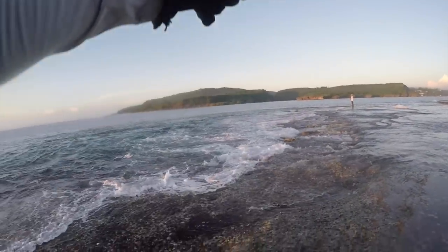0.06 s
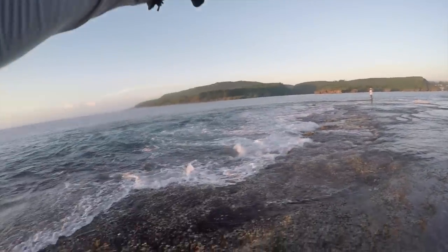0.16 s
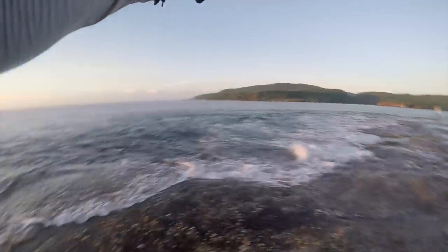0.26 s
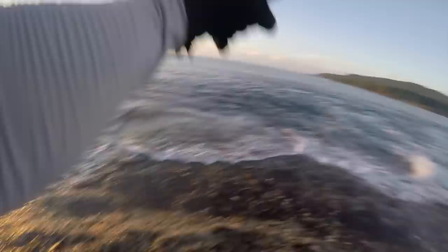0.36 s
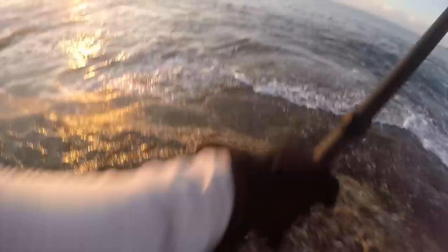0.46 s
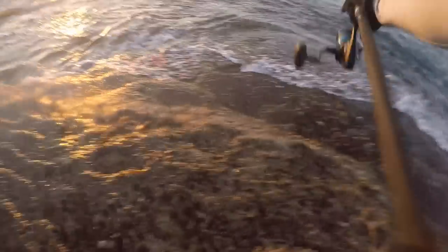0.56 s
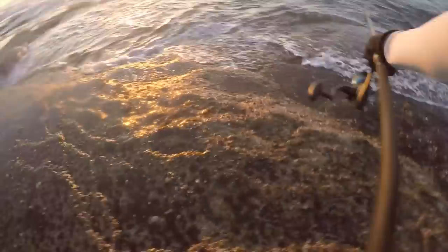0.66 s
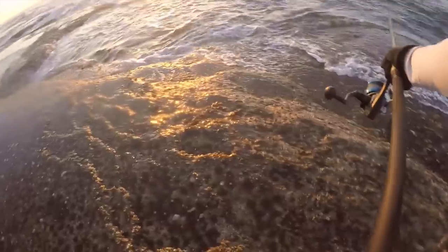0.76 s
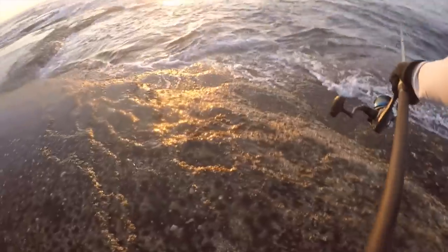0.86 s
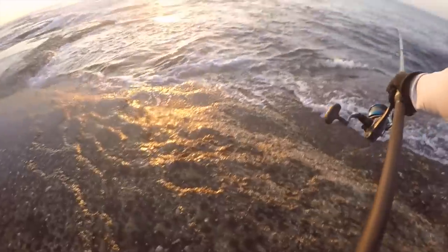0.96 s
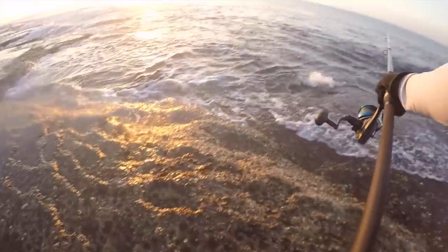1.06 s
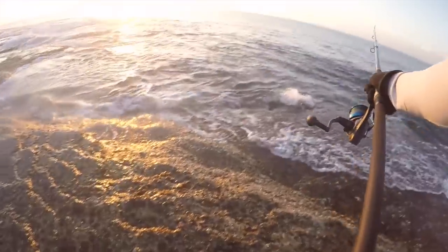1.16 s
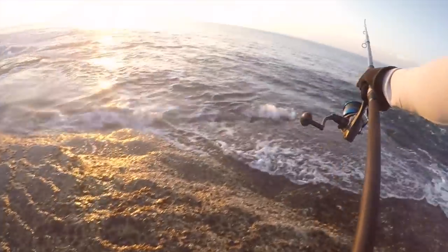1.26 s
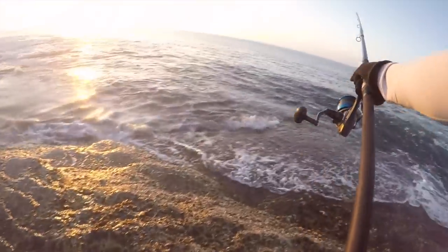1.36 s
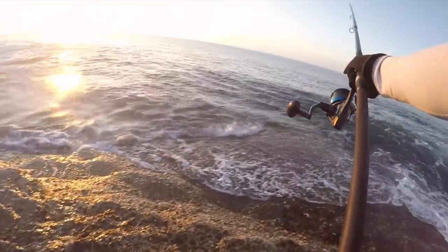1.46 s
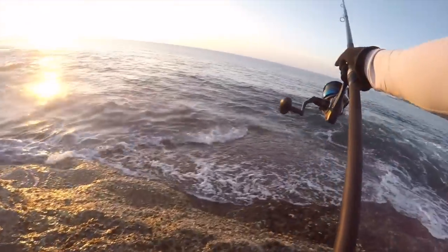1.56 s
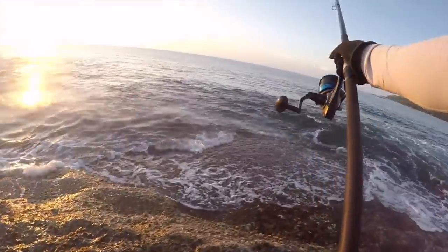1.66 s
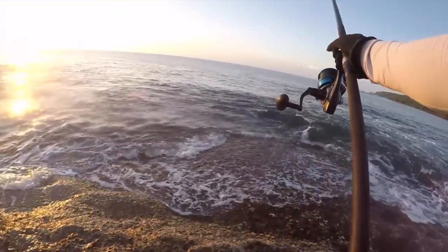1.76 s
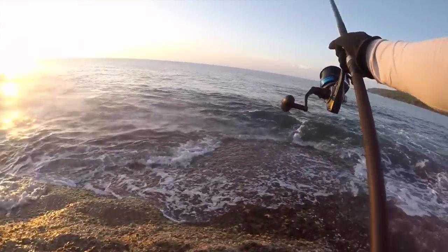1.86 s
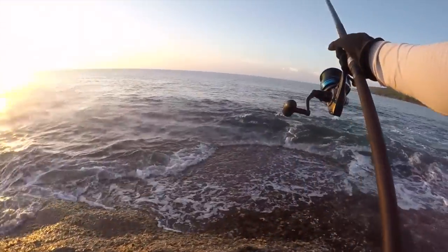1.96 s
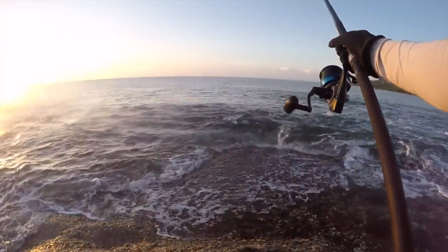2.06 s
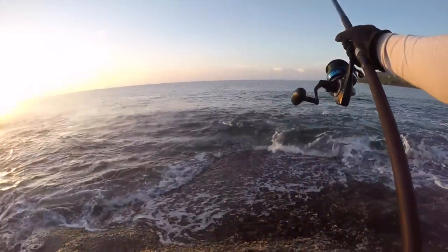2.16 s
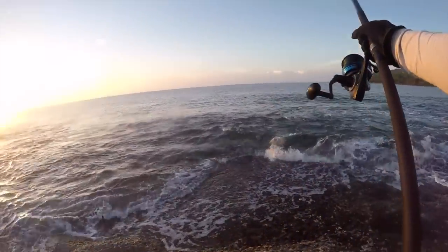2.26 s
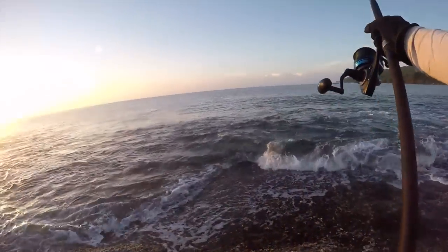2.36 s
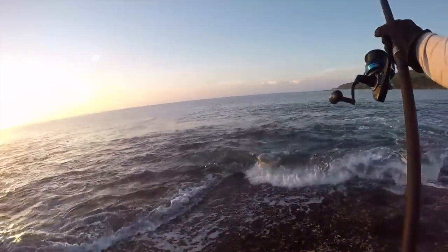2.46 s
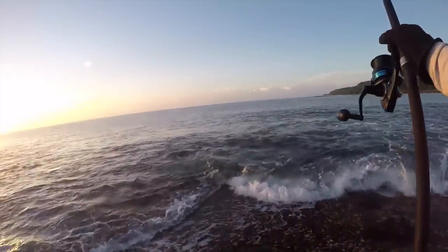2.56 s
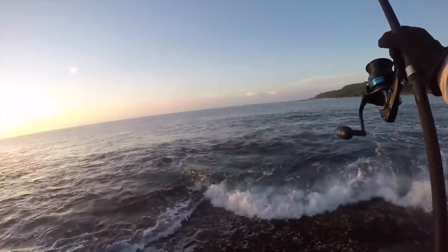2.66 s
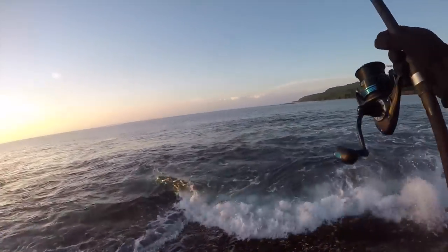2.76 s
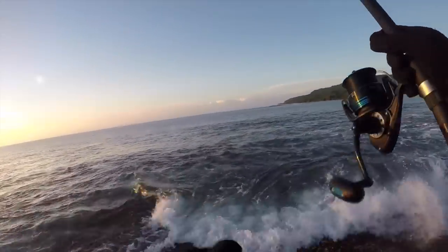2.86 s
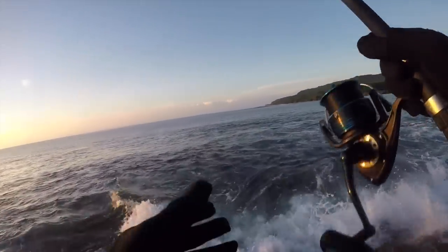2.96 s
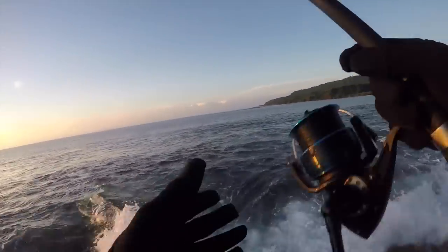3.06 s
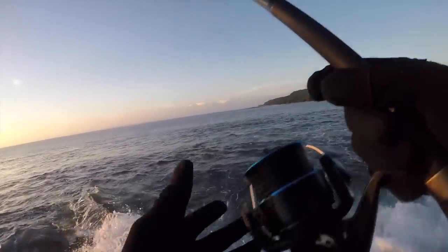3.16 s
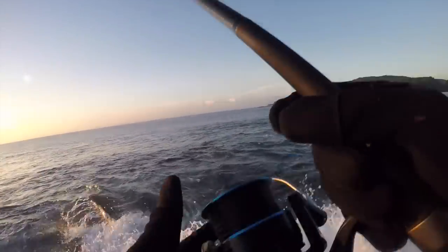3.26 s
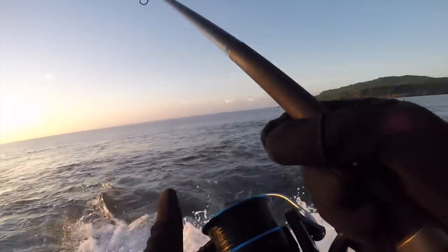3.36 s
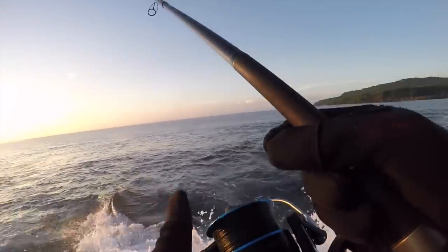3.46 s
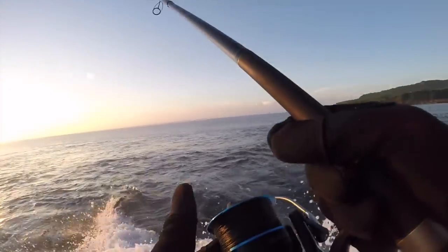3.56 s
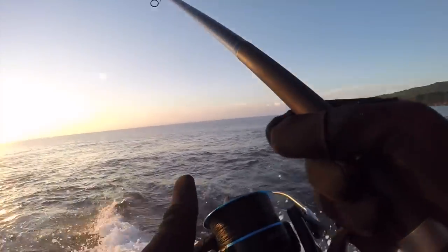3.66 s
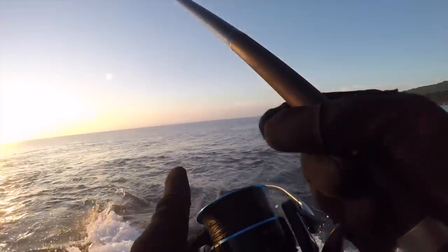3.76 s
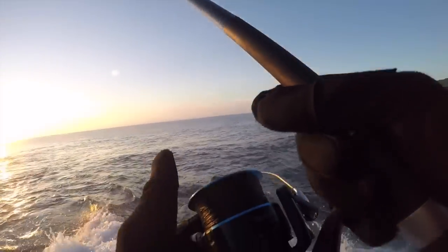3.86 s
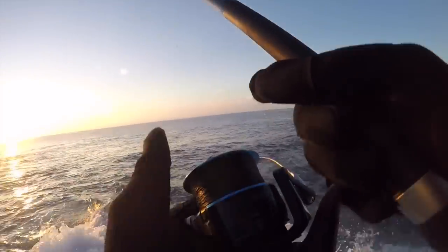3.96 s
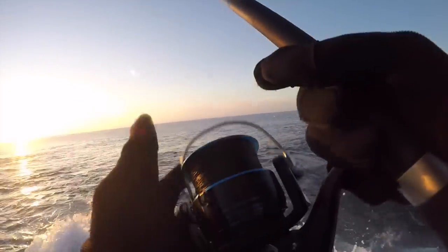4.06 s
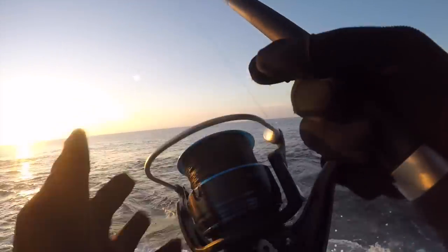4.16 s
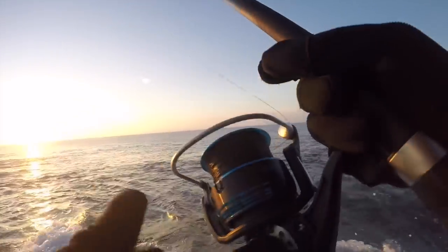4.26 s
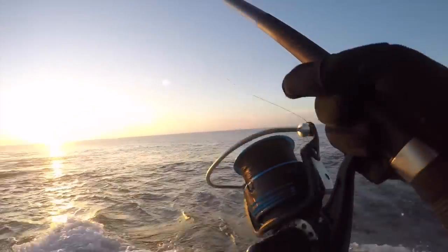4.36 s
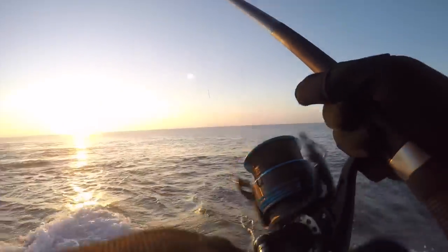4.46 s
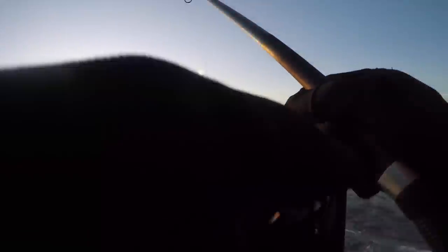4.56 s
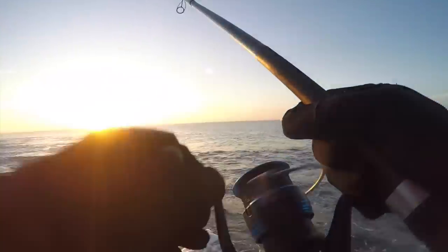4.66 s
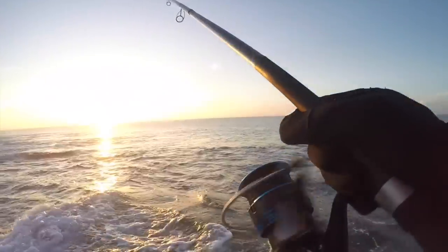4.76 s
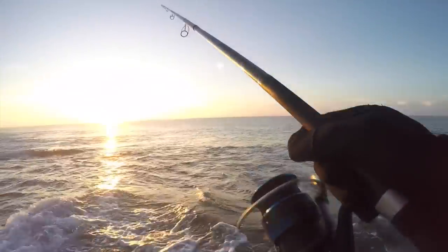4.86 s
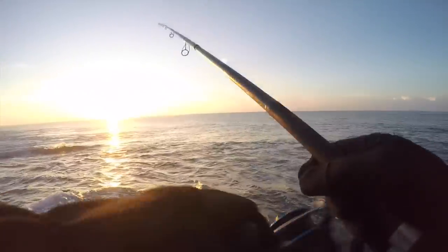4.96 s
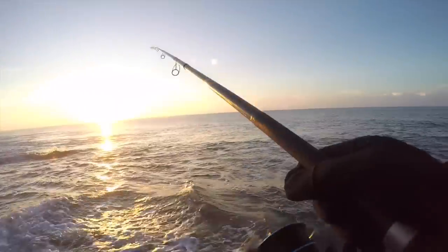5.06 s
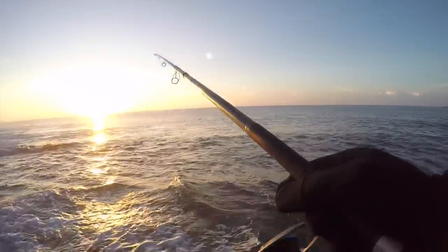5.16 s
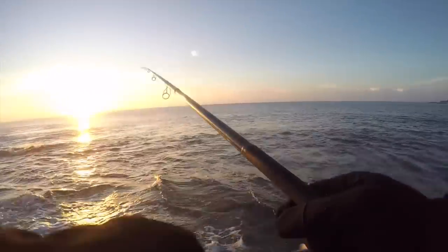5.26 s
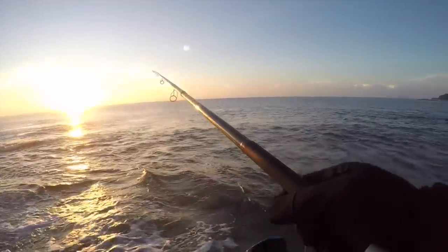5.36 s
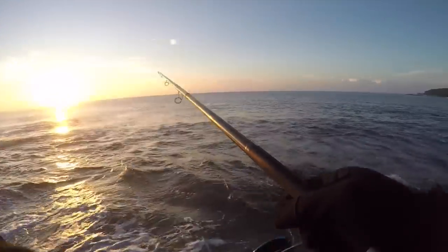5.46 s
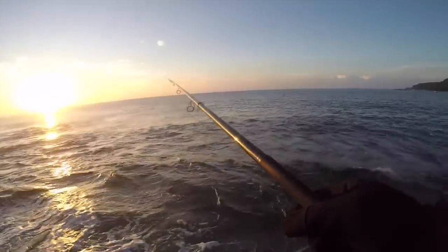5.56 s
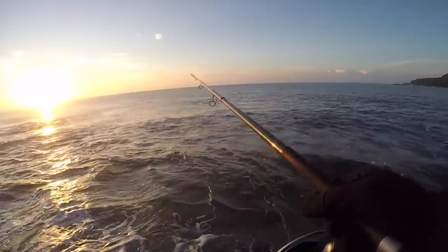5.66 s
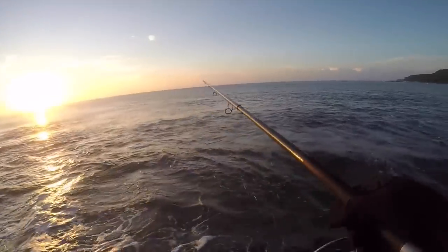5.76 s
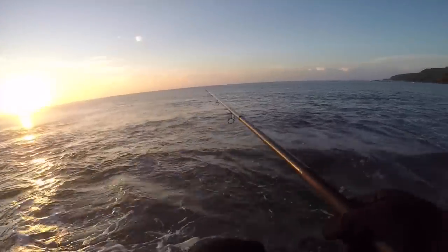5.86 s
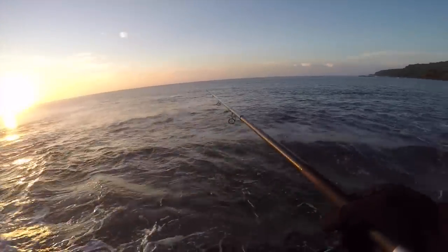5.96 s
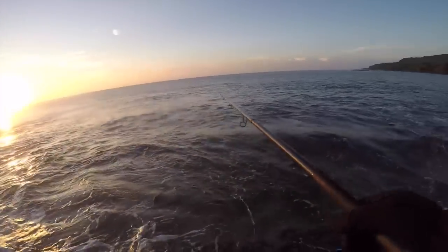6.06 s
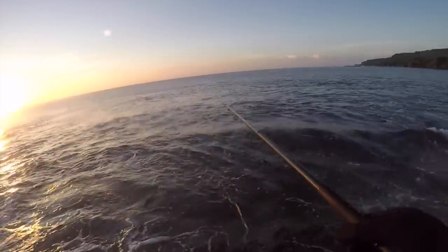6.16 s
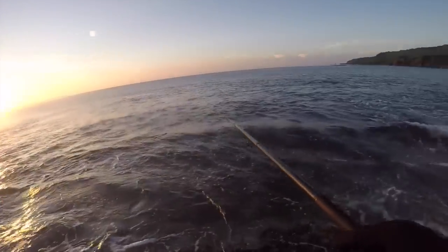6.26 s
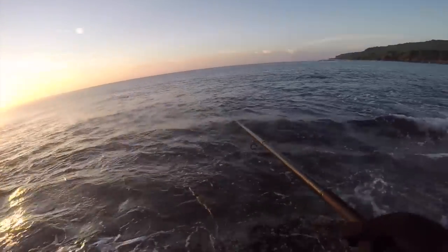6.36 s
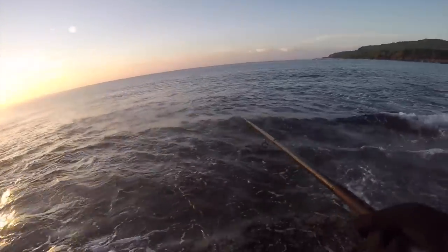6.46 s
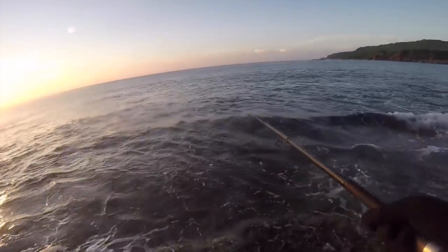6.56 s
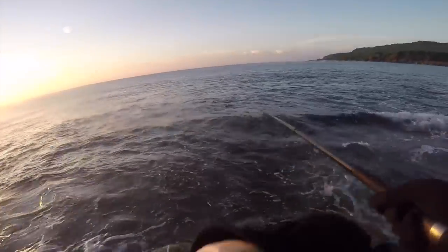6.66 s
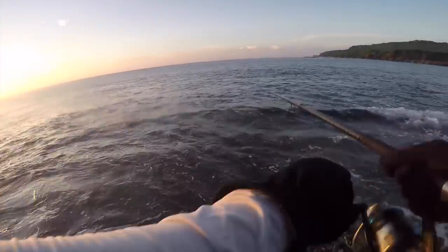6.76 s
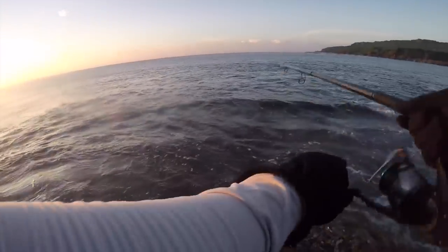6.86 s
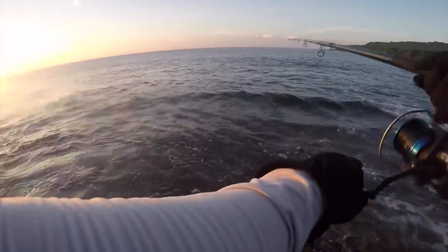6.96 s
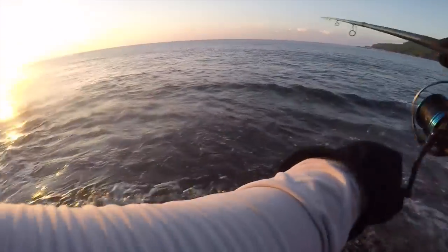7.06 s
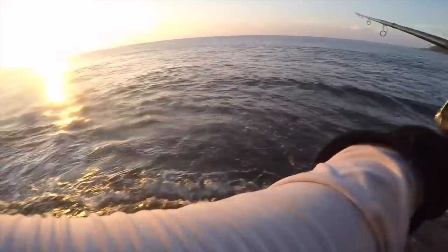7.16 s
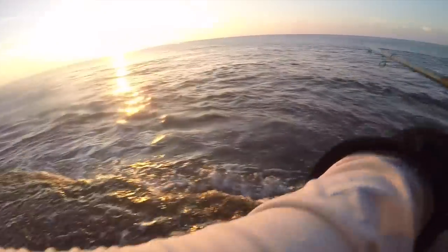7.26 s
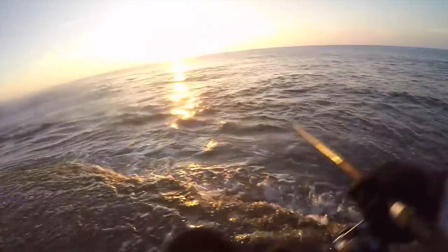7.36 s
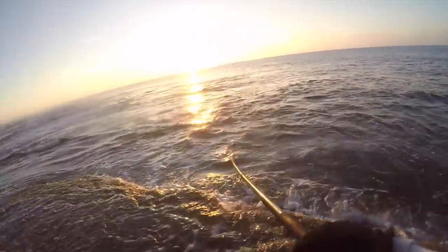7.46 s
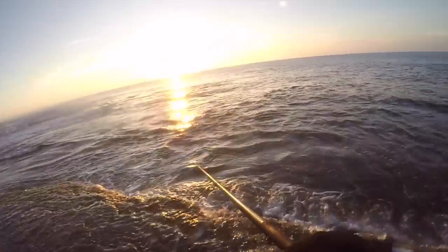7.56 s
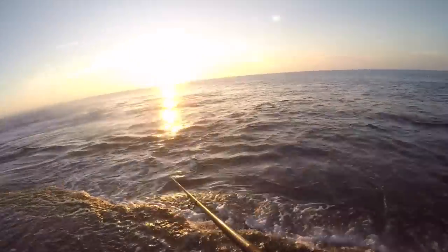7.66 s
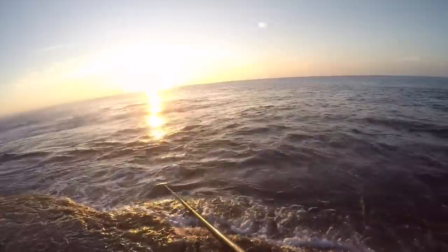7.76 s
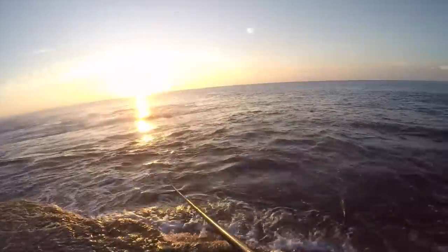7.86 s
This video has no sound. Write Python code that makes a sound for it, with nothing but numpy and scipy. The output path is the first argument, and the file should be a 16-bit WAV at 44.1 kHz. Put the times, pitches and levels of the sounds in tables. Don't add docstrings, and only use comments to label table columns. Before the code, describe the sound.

Close, boxy microphone on an angler's body by the sea. The cast begins with hard plastic-like knocks, gritty sleeve friction, rod swish and low booms, followed by a faint falling line hum. Breakers build, churn and splash over a steady slow heartbeat and low rumble. A bright metallic click and a short rasping snap come midway, then fine drips, a hollow handle tap, quieter wash, a last soft bump, and faint hiss throughout.

```python
import sys
import numpy as np
from scipy import signal
from scipy.io import wavfile
from scipy.ndimage import uniform_filter1d

SR = 44100
rng = np.random.default_rng(int(sys.argv[2]) if len(sys.argv) > 2 else 0)


def level_to_linear(level):
    exponent = np.asarray(level, float) / 20
    return 10 ** exponent


def transcribe(u):
    v = np.clip(np.atleast_2d(u).T, -1, 1)
    q = np.round(v * 32767).astype(np.int16)
    wavfile.write(sys.argv[1], SR, q)


N = 348831

# centre in Hz, width in Hz, gain in dB.
CASE = [(1442, 108, -21.5), (1750, 150, 1), (2079, 388, -11), (2516, 250, 4.5), (2920, 178, -9),
        (3430, 340, 2), (3774, 137, -7.5), (4190, 240, 4.5), (4390, 130, -4.5), (4970, 180, -5),
        (5850, 260, -7.5), (6620, 280, 4.5), (8800, 600, -3.5), (10900, 410, -3.5)]


def evened(x):
    return x / np.sqrt(np.mean(x ** 2) + 1e-20)


def column(rows, index, t):
    return np.interp(t, np.transpose(rows)[0], np.transpose(rows)[index])


def swells(rows, index, t):
    return sum(row[index] * np.exp(-((t - row[0]) / row[1]) ** 2) for row in rows)


def stroke(t, peak_s, rise_s, fall_s):
    return np.exp(-((t - peak_s) / np.where(t < peak_s, rise_s, fall_s)) ** 2)


def slope_db(points, hz):
    f, db = np.transpose(points)
    db = np.interp(np.log(hz + 1), np.log(f + 1), db)
    return db - 10 * np.log10(np.mean(10 ** (db / 10)))


def bumps_db(peaks, hz):
    return sum(db / (1 + (2 * (hz - f) / width) ** 2) for f, width, db in peaks)


def noise(field_db, size=1024, span=(0, N / SR)):
    hop, edge_hz = size // 4, 15320
    t = np.arange(span[0], span[1] + size / SR, hop / SR)
    hz = np.fft.rfftfreq(size, 1 / SR)
    a, b = rng.standard_normal((len(t), len(hz), 2)).T
    gain = level_to_linear(field_db(t, hz[:, None])) * (hz < edge_hz)[:, None]
    out = np.zeros(N)
    add(out, span[0], signal.istft((a + 1j * b) * gain, nperseg=size, noverlap=size - hop)[1])
    return out * np.sqrt(3 / size)


def patches(t, hz, frames, bins):
    field = rng.standard_normal((len(t), len(hz))).T
    return evened(uniform_filter1d(uniform_filter1d(field, int(bins), 0), int(frames), 1))


def add(mix, s, sound):
    part = mix[round(s * SR):][:len(sound)]
    part += sound[:len(part)]


def band(x, lo_hz, hi_hz):
    return signal.sosfilt(signal.butter(3, [lo_hz, hi_hz], "band", fs=SR, output="sos"), x)


def ring(drive, modes, damping=1, alternate=False):
    t = np.arange(SR // 8) / SR
    body = 0
    for k, (hz, db, t60) in enumerate(modes):
        spectrum = abs(np.sum(drive * np.exp(2j * np.pi * hz * t[:len(drive)])))
        taken = spectrum + 0.15 * np.linalg.norm(drive)
        sign = (-1) ** (k * alternate)
        body = body + sign * level_to_linear(db - 60 * damping * t / t60) * np.sin(2 * np.pi * hz * t) / taken
    out = signal.fftconvolve(drive, body)
    return out / abs(out).max()


def contact(seconds, draw):
    t = np.arange(len(draw)) / SR
    return draw * abs(draw) * np.exp(-(t / max(seconds, .0005)) ** 2) * np.minimum(t / 0.00085, 1)


def sea():
    # frequency in Hz, level in dB.
    wash = [(600, -16), (1100, -8.5), (1600, 2), (3000, -1), (3900, -11), (6500, -34)]
    plunge = [(60, -20), (130, 1.5), (400, 1), (1200, -0.5), (1900, 5.5), (3500, -53)]
    crest = [(2500, -6), (3700, 3), (4600, 1.5), (5500, -8.5), (7000, -41.5)]
    fizz = [(4000, -11.5), (5800, 3), (7000, -1), (9000, -6), (12000, -9.5), (15500, -16.5)]
    # time in seconds, wash level in dB, breaking of the crest in dB.
    waves = [(0.0, -46, -3.5), (0.8, -49.5, 1), (1.27, -48, 0.5), (1.89, -47.5, -4), (2.2, -46.5, -0.5),
             (2.44, -43, -2.5), (2.6, -40.5, 3), (3.04, -37, 3.5), (3.3, -38, -3.5), (3.45, -43.5, 0),
             (3.65, -41.5, -1.5), (3.85, -36, 0.5), (4.01, -39, 1.5), (4.12, -45, 1), (4.5, -45.5, 0),
             (5.4, -49, -1.5), (6.25, -54.5, 1.5), (7.55, -43, -5.5)]
    # calm level in dB, dB per dB of wash, dB per dB of breaking.
    follow = [
        (-55.5, .5, 0.3),
        (-58, 1.16, 0.96),
        (-63.5, 1.11, 0.73),
    ]
    # time in seconds, length in seconds, gain in dB.
    breakers = [(2.6, 0.1, 4.5), (3.14, 0.27, 7.5), (3.55, 0.29, 6.5), (3.84, 0.19, 8), (4.3, 0.24, 7),
                (7.0, 0.52, 3)]
    # time in seconds, length in seconds, gain over the fizz in dB.
    spray = [(3.5, 0.16, 5), (3.633, 0.043, 6), (4.396, 0.074, 5.5), (5.09, 0.055, 3.5), (5.17, 0.025, 7.5)]
    # time in seconds, gain over the wash in dB.
    slaps = [(2.36, -0.5), (2.39, 3), (2.53, 0), (2.685, 1), (2.79, 0), (2.82, 0), (2.98, 2), (3.05, 2),
             (3.14, 2), (3.22, 0.5), (3.395, 1), (3.55, -3), (3.69, 0), (3.74, 2), (3.785, 3), (3.9, 0),
             (3.98, 0), (4.105, -1.5), (4.34, -1), (4.37, 1.5), (4.49, 1.5)]
    # time in seconds, length in seconds, gain in dB.
    whistle = [(5.3, 0.25, 7.3)]
    calm_db, slap_rise_s, slap_fall_s = -48, 0.0041, 0.024
    whistle_hz, whistle_width_hz = 2570, 110

    def field(t, hz):
        wash_db, breaking_db = column(waves, 1, t), column(waves, 2, t)
        plunge_db, crest_db, fizz_db = (
            db + a * (wash_db - calm_db) + b * breaking_db for db, a, b in follow)
        levels_db = wash_db, plunge_db + swells(breakers, 2, t), crest_db, fizz_db
        power = sum((level_to_linear(slope_db(points, hz)) * level_to_linear(db)) ** 2
                    for points, db in zip((wash, plunge, crest, fizz), levels_db))
        foam_db = swells(spray, 2, t) + 1.14 * patches(t, hz, 86, 25)
        high_db = np.clip(hz / 7000, 0, 1) ** 2 * foam_db
        slaps_db = sum(db * stroke(t, s, slap_rise_s, slap_fall_s) for s, db in slaps)
        splashes_db = slaps_db - 0.8 + 0.82 * patches(t, hz, 2, 120)
        whistle_db = bumps_db([(whistle_hz, whistle_width_hz, swells(whistle, 2, t))], hz)
        case_db = bumps_db(CASE, hz) + 1.18 * patches(t, hz, 18, 9)
        return 10 * np.log10(power) + case_db + splashes_db + high_db + 2.0 + whistle_db
    return noise(field, size=512)


def butt():
    # time in seconds, peak in dB.
    strikes = [
        (0.4005, -4),
        (0.6728, -4),
    ]
    # delay in seconds, level in dB.
    bounce_tables = [
        [(0, -3.5), (.0011, 1.5), (.0023, 1.5), (.0043, -8.5)],
        [(0, -2.5), (.0009, -1), (.0023, 0.5), (.0041, -11)],
    ]
    # frequency in Hz, level in dB, t60 in seconds.
    mode_tables = [
        [(467, -12, 0.028), (630, 1.5, 0.048), (905, -2, 0.029), (1013, -5, 0.031), (1156, -6, .028),
         (1300, -13, 0.038), (1840, -16, .014), (2250, -7, 0.02), (2660, -23, 0.011), (3080, -17, .01),
         (3655, -9.5, .013), (4200, -13, 0.01), (4650, -22, 0.0089), (5400, -24, .007)],
        [(463, -1, .02), (598, 0, 0.047), (867, 1.5, 0.038), (1040, -3.5, 0.033), (1196, -1.5, 0.024),
         (1500, -38, .015), (1820, -12, 0.018), (2180, -9, .018), (2355, -7.5, 0.024), (3080, -19, .01),
         (3620, -12, .011), (4150, -14, .009), (4800, -29, .007), (5800, -36, .006)],
    ]
    touch_s = .00018
    out, t = np.zeros(N), np.arange(400) / SR
    for (s, db), bounces, modes in zip(strikes, bounce_tables, mode_tables):
        drive = sum(level_to_linear(b_db) * np.exp(-((t - delay - 2 * touch_s) / touch_s) ** 2)
                    for delay, b_db in bounces)
        add(out, s, level_to_linear(db) * ring(np.gradient(drive), modes, alternate=True))
    return band(out, 380, 7000)


def knocks():
    # time in seconds, peak in dB, bright peak in dB, contact in seconds, damping factor.
    blows = [(0.436, -23, -36, 0.0041, 1.1), (0.561, -31, -30, 0.0028, 0.9), (.6515, -22, -27, 0.0076, 1.5),
             (6.062, -36, -53, 0.0063, 4.4), (7.386, -22.5, -46, 0.0038, 2.3),
             (5.964, -40, -60, 0.0047, 3.1)]
    # frequency in Hz, level in dB, t60 in seconds.
    shell_modes = [(464, -39, 0.027), (633, -3, 0.068), (917, -0.5, 0.035), (1000, -5, 0.055),
                   (1125, -2, 0.025), (1270, -31, 0.033)]
    bright_modes = [(1820, -10, .015), (2290, 23, 0.014), (2600, -10, 0.01), (3100, 13, 0.015),
                    (3644, 23.5, 0.019), (4200, 21, 0.01), (4900, 1, .008), (5400, -10, .008),
                    (6650, -10, .006)]
    tap_modes = [(460, -7.5, .03), (607, -4.5, 0.05), (850, -12, 0.014), (1005, 3, 0.024),
                 (1200, -7, 0.013), (1580, -3.5, .025), (2050, -12, 0.024), (2450, -11, .015),
                 (2800, -16, 0.014), (3200, -5, 0.01), (3600, -7, 0.012), (4460, -24, 0.0095),
                 (5500, -17, 0.0073), (6400, -21, .008)]
    # time in seconds, peak in dB, contact in seconds.
    handle_tap = (5.7198, -9.5, 0.0031)
    dull_hz = 1570
    shell, bright, tap = np.zeros((3, N))
    draws = rng.standard_normal((len(blows) + 1, 800))
    tap_s, tap_db, tap_contact_s = handle_tap
    add(tap, tap_s, level_to_linear(tap_db) * ring(contact(tap_contact_s, draws[0]), tap_modes, 1.13))
    for (s, db, bright_db, seconds, damping), draw in zip(blows, draws[1:]):
        body = ring(contact(0.88 * seconds, draw), shell_modes, damping)
        add(shell, s, level_to_linear(db) * band(body, 300, dull_hz / damping ** .45))
        add(bright, s, level_to_linear(bright_db) * ring(contact(seconds, draw), bright_modes, damping))
    return band(tap, 300, 4900) + band(shell, 415, 1700) + band(bright, 2000, 6400)


def pushes():
    # time in seconds, peak in dB, frequency in Hz, t60 in seconds.
    plate = [(0.401, -15, 126.4, 0.11), (0.404, -17, 256, 0.059), (0.436, -13, 135, 0.063),
             (0.539, -7, 152, 0.024), (0.6495, -2.5, 207, 0.024), (0.675, -11.5, 135, 0.03),
             (0.706, -18, 111, 0.04), (4.582, -29.5, 269, 0.07), (4.59, -26, 115, 0.091),
             (5.603, -38.5, 140, 0.055), (5.7204, -19.5, 169, 0.048), (5.814, -42, 128, 0.056),
             (5.963, -35.5, 147, 0.051), (6.066, -28.5, 169, 0.036), (7.155, -34.5, 129, 0.052),
             (7.382, -25.5, 170, 0.0092), (7.514, -36.5, 189, 0.038), (0.246, -37.5, 131, 0.17),
             (2.35, -38.5, 158.7, 0.067)]
    out = np.zeros(N)
    for s, db, hz, t60 in plate:
        add(out, s, -level_to_linear(db) * ring(np.hanning(int(.35 * SR / hz)), [(hz, 0, t60)]))
    return out


def thud_rows():
    # trough in seconds, peak in dB, frequency in Hz.
    beats = [(0.92, -20, 43.7), (1.346, -22, 50.5), (1.771, -18.5, 47.7), (2.189, -19, 45.3),
             (2.606, -19.5, 38.4), (3.018, -19.5, 51), (3.436, -22, 49), (3.848, -23.5, 40.8),
             (4.267, -25, 51.3), (4.679, -22, 51), (5.094, -23, 52.4), (5.508, -25.5, 44),
             (5.931, -32.5, 44.45), (6.326, -26, 40.7), (6.729, -28.5, 40.8), (7.172, -30, 41)]
    # trough in seconds, peak in dB, frequency in
    # Hz, length in seconds.
    strap_jolts = [(0.082, -27.5, 35.4, 0.039), (0.309, -30, 28, 0.037), (0.383, -0.5, 35.8, 0.02),
                   (0.448, -9.5, 35, 0.023), (0.53, -11.5, 48.6, 0.033), (0.5624, -1.5, 34.6, 0.026),
                   (0.67, -5.5, 30, 0.033), (0.703, -20, 45, 0.018), (0.739, -10.5, 27, 0.046),
                   (0.767, -30, 30, 0.049), (0.837, -34, 28, 0.036), (2.441, -34, 34, 0.028),
                   (2.886, -30, 28, 0.05), (4.572, -19.5, 28.1, 0.023), (4.623, -18, 22.9, 0.045),
                   (5.182, -32.5, 28.2, 0.095), (5.613, -32, 51, 0.032), (5.826, -31, 48, 0.022),
                   (5.975, -24.5, 36.2, 0.04), (6.076, -39, 60.4, 0.0163), (7.395, -21, 40.2, 0.03),
                   (7.442, -8.5, 33, 0.043), (7.477, -21, 31.7, 0.049), (7.538, -24, 31, 0.061),
                   (7.601, -25.5, 28, 0.026), (7.723, -32, 30.7, 0.04), (4.567, -25, 70, 0.022),
                   (4.703, -28, 60, 0.016), (4.295, -32, 70, 0.016)]
    # length in seconds, quickening in 1/s.
    upright = (0.027, 10.6)
    bent = (0.034, -13)
    lean_s = 4.1
    second_s, second_db, second_hz, second_length_s, second_quicken = .19, -14, 31, 0.051, 2.4
    first = [(s, db, hz, *(upright if s < lean_s else bent)) for s, db, hz in beats]
    second = [(s + second_s, db + second_db, second_hz, second_length_s, second_quicken)
              for s, db, hz in beats]
    jolts = [(*row, -max(25.7 + 1.66 * row[1], 3.1)) for row in strap_jolts]
    return first + second + jolts


def thuds():
    out = np.zeros(N)
    for s, db, hz, length, quicken in thud_rows():
        t = np.arange(-.06 * SR, .12 * SR) / SR
        turn = 2 * np.pi * hz * np.expm1(1.5 * quicken * t) / (1.5 * quicken)
        swing = -np.cos(turn) - 0.16 * np.sin(2 * turn)
        late = t - 0.0001 * quicken
        sudden = 2 + max(-.2 * quicken, 0)
        before = abs(late / (.5 * length + 0.00041)) ** sudden
        after = (late / (0.85 * length)) ** 2
        add(out, s + t[0], level_to_linear(db - 2.5) * swing * np.exp(-np.where(late < 0, before, after)))
    return out


def rub():
    # peak time in seconds, rise in seconds, fall in seconds, level in dB, tilt in dB per octave.
    strokes = [(.37, 0.019, 0.053, -42.5, -5.5), (.45, 0.047, 0.018, -37.5, -1.5),
               (.485, 0.033, 0.017, -34.5, 1.5), (0.516, 0.036, 0.018, -29.5, 0),
               (0.546, 0.0079, 0.013, -37, -3), (0.598, 0.036, 0.025, -42, 2), (.66, 0.018, 0.0145, -35, 2),
               (0.719, 0.049, 0.014, -40.5, -1), (.765, 0.021, .015, -47, 2.5)]
    # frequency in Hz, level in dB.
    colour = [(150, -32), (300, 3), (1000, -2.5), (2500, -6.5), (4500, -10), (7000, -23.5), (8500, -34),
              (12000, -52), (15500, -56)]
    # centre in Hz, width in Hz, gain in dB.
    peaks = [(604, 86, -1), (1120, 220, 6), (2325, 250, 14.5), (3620, 400, 13.5), (6560, 500, 7),
             (12300, 1500, 5)]

    def field(t, hz):
        power = 1e-12
        for s, rise, fall, db, tilt_db in strokes:
            tilted_db = db + tilt_db * np.log2((hz + 50) / 2000)
            power = power + (stroke(t, s, rise, fall) * level_to_linear(tilted_db)) ** 2
        flutter_db = 2.6 * patches(t, hz, 3.6, 22) - 5.5
        return 10 * np.log10(power) + slope_db(colour, hz) + bumps_db(peaks, hz) + flutter_db
    return noise(field, size=256, span=(.3, .9))


def swish():
    # peak time in seconds, rise in seconds, fall in seconds, level in dB.
    passes = [(0.597, 0.017, 0.02, -35), (0.642, 0.014, 0.01, -36)]
    # frequency in Hz, level in dB.
    colour = [(500, -8), (1700, 5), (3200, 2), (4500, -6), (6800, -14), (9000, -24), (15500, -30)]

    def field(t, hz):
        power = sum((level_to_linear(db) * stroke(t, s, rise, fall)) ** 2 for s, rise, fall, db in passes)
        case_db = 0.9 * bumps_db(CASE, hz) + 3.0 * patches(t, hz, 2.6, 18)
        return 10 * np.log10(power + 1e-12) + slope_db(colour, hz) + case_db
    return noise(field, size=256, span=(.5, .7))


def hum():
    # time in seconds, frequency in Hz, level in dB.
    line = [(1.07, 144, -59), (1.1, 144, -46.5), (1.15, 120, -43), (1.2, 119, -60), (1.256, 137, -58),
            (1.26, 133, -55)]
    t = np.arange(N) / SR
    live = np.clip(np.minimum(t - line[0][0], line[-1][0] - t) / .015, 0, 1)
    phase = 2 * np.pi * np.cumsum(column(line, 1, t)) / SR
    return np.sqrt(2) * live * level_to_linear(column(line, 2, t)) * np.sin(phase)


def reel():
    # time in seconds, peak in dB, rattle in seconds.
    clicks = [(4.177, -14.5, 0.007), (4.205, -27, 0.014), (4.185, -26, 0.011), (4.698, -34.5, 0.0082)]
    # frequency in Hz, level in dB, t60 in seconds.
    wire_modes = [(1750, -9, .012), (2590, 4.5, 0.016), (3150, 2, 0.016), (3730, 4.5, 0.009),
                  (4216, -1, .01), (4660, -5, 0.013), (6400, -4, 0.011), (7730, -5, 0.022),
                  (10120, -12.5, .008), (12500, -21, .006)]
    # time in seconds, scrape level in dB, ring level in dB.
    snap = [(4.548, -53, -70), (4.566, -34.5, -54), (4.578, -35.5, -48), (4.59, -31.5, -27),
            (4.602, -32.5, -28), (4.609, -37, -53), (4.612, -70, -46), (4.66, -75, -72)]
    # frequency in Hz, level in dB.
    colour = [(200, -13), (1500, 3), (3500, -0.5), (6000, -9), (10000, -8), (15800, -15)]
    # centre in Hz, width in Hz, level in dB.
    scrape_peaks = [(3920, 460, 6), (5800, 600, 9), (5000, 360, -2)]
    buzz_peaks = [(292, 140, -7), (2010, 110, -6), (2260, 110, 0), (2633, 65, 0)]

    def scrape_field(t, hz):
        return slope_db(colour, hz) + 0.21 * bumps_db(CASE, hz) + bumps_db(scrape_peaks, hz) + 0 * t

    def buzz_field(t, hz):
        gain = sum(level_to_linear(db) / (1 + (2 * (hz - f) / width) ** 2) for f, width, db in buzz_peaks)
        return 20 * np.log10(gain) + 0 * t

    out, t = np.zeros(N), np.arange(N) / SR
    for (s, db, seconds), draw in zip(clicks, rng.standard_normal((len(clicks), 800))):
        drive = contact(seconds, draw)
        add(out, s, level_to_linear(db - 0.5) * ring(drive, wire_modes))
        add(out, s, level_to_linear(db - 4) * band(drive / abs(drive).max(), 2000, 7000))
    out = band(out, 1900, 15300)
    live, span = (t > snap[0][0]) & (t < snap[-1][0]), (4.5, 4.75)
    grit = level_to_linear(3.7 * evened(uniform_filter1d(rng.standard_normal(N), 40)))[live]
    scrape = evened(grit * noise(scrape_field, span=span)[live])
    buzz = evened(noise(buzz_field, span=span)[live])
    out[live] += level_to_linear(column(snap, 1, t[live])) * scrape + level_to_linear(column(snap, 2, t[live])) * buzz
    return out


def ticks():
    # time in seconds, peak in dB, frequency in Hz, t60 in seconds.
    taps = [(1.2, -41, 5700, 0.0051), (4.905, -42, 9200, .008), (5.11, -43, 9530, 0.0048),
            (5.183, -38, 5600, 0.0048), (5.2, -45, 10000, 0.0046), (5.257, -35, 4200, 0.0049),
            (5.2572, -46, 12000, .003), (5.358, -45, 7950, .005), (5.805, -53, 9800, .006),
            (7.047, -28, 1730, 0.02), (1.705, -48, 11000, .005), (6.98, -52, 7800, .008),
            (4.184, -28, 8000, 0.023), (4.192, -34, 6500, 0.013), (4.607, -30, 2640, 0.022),
            (4.621, -34, 2640, 0.018), (4.646, -39, 2600, 0.027), (.51, -25, 1080, 0.016),
            (.541, -38, 5600, .01), (.562, -30, 4300, .008), (.657, -34, 3750, .015),
            (.666, -28, 3650, .015), (.70, -31, 1700, 0.017), (.688, -39, 3800, .012),
            (.716, -30, 3800, 0.012), (5.731, -35, 1050, 0.013), (.4018, -23.5, 4900, 0.0066),
            (.4021, -28.5, 5650, 0.0066), (0.44, -35, 7500, .004), (.6742, -21, 4000, 0.0074),
            (.6744, -28, 4940, .007), (.6741, -34, 5800, .005)]
    out = np.zeros(N)
    for s, db, hz, t60 in taps:
        start = np.hanning(int(t60 * SR / 8) + 3)
        drive = start * np.cos(2 * np.pi * 0.9 * hz * np.arange(len(start)) / SR)
        add(out, s, level_to_linear(db) * ring(drive, [(hz, 0, t60), (0.92 * hz, -7, t60)]))
    return out


def tremor():
    # frequency in Hz, level in dB.
    deep = [(10, 1), (20, 6.5), (40, 0.5), (60, -19), (90, -29), (140, -55)]
    upper = [(40, -27), (75, 4.5), (130, -4.5), (200, -15), (350, -65)]
    # time in seconds, length in seconds, deep gain in dB, upper gain in dB.
    efforts = [(.1, 0.2, -15, 11.5), (.55, 0.21, 12.5, 18.5), (.75, 0.1, 8, 8), (1.7, 0.11, -5.5, 2),
               (2.25, 0.051, 10.5, -4), (2.7, 0.13, 9, -1), (5.2, 0.59, 7, 0), (5.93, 0.15, 6, 5),
               (7.5, 0.12, 6.5, 9.5)]
    deep_db, upper_db = -38, -63
    t = np.arange(0, N + 256, 256) / SR

    def layer(points, level_db, lumpy_db):
        lumps = evened(uniform_filter1d(uniform_filter1d(rng.standard_normal(N), 1500), 1500))
        rumble = noise(lambda t, hz: slope_db(points, hz) + 0 * t, size=4096)
        return rumble * level_to_linear(np.interp(np.arange(N) / SR, t, level_db) + lumpy_db * lumps)
    return (layer(deep, deep_db - 6.0 + swells(efforts, 2, t), lumpy_db=4.0)
            + layer(upper, upper_db + 5.0 + swells(efforts, 3, t), lumpy_db=5.0))


def hiss():
    # frequency in Hz, level in dB.
    colour = [(200, -13), (2000, -13), (6000, 0), (15500, 17)]
    # centre in Hz, width in Hz, gain in dB.
    humps = [(9530, 110, 17), (10300, 250, 11), (12900, 230, 10), (14310, 190, 14)]
    hiss_db = -72.5
    return noise(lambda t, hz: hiss_db + slope_db(colour, hz) + bumps_db(humps, hz) + 0 * t)


def scene():
    blows = butt() + knocks() + pushes() + thuds()
    gear = rub() + swish() + hum() + reel() + ticks()
    return (sea() + blows + gear + tremor() + hiss())[None]


def top_cut(x):
    return signal.sosfilt(signal.butter(12, 15700, fs=SR, output="sos"), x)


def record(dry):
    top_hz = 15550
    lowpass = signal.firwin(255, top_hz, window=("kaiser", 9), fs=SR)
    limited = 1.33 * np.tanh(dry / 1.268)
    return top_cut(signal.oaconvolve(limited, lowpass[None], "same"))


dry = scene()
out = record(dry)
transcribe(out)
```